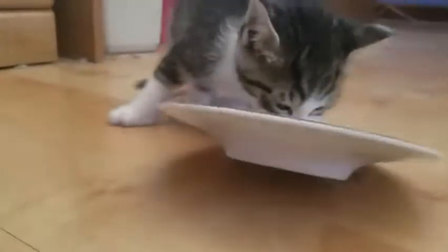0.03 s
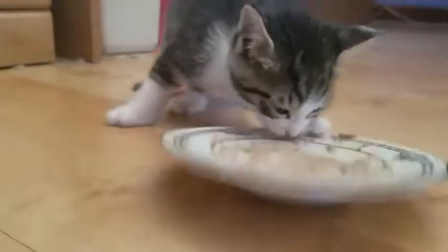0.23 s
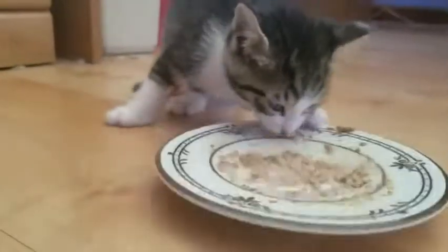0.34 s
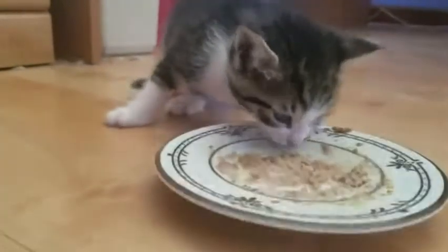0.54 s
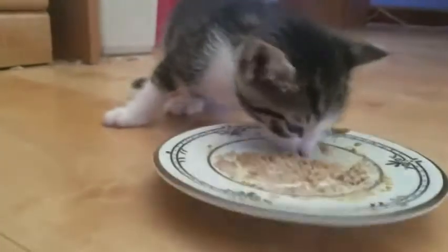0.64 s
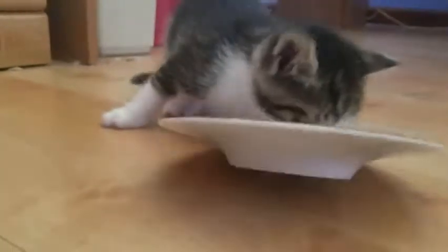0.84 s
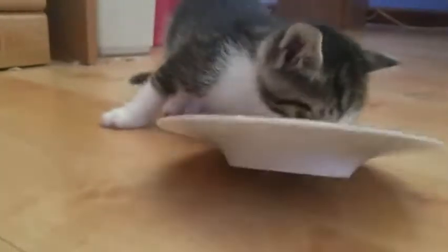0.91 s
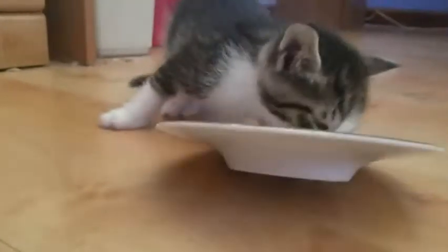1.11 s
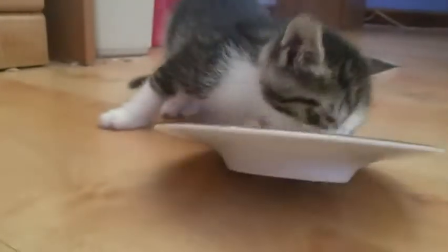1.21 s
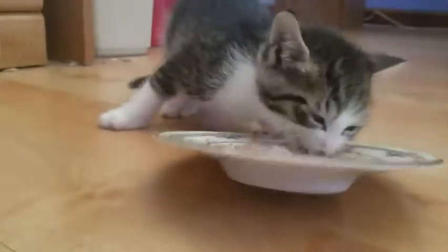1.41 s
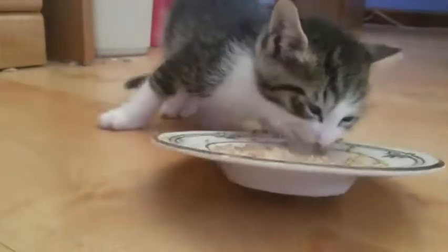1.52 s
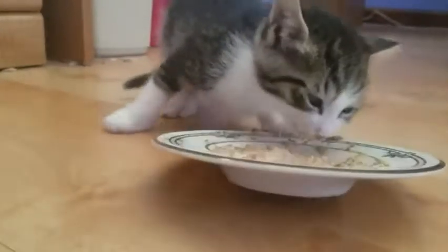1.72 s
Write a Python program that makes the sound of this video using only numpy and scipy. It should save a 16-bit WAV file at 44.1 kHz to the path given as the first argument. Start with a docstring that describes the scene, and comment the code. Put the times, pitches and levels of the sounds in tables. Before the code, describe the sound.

A ceramic plate tips and thumps on a wooden floor, drops back with a bright clink and a quick bounce, then rocks with light taps. It is heard up close in a small, quiet room.

```python
"""A ceramic plate tips on a wooden floor as a kitten feeds from it. Its rim thumps the boards, it drops
back on its foot with a clink and one bounce, and later it rocks with a few light taps. Each impact
excites damped modes of plate and boards; food and tongue add tiny gritty clicks. The small room
reverberates briefly after each blow, over a low hum and a faint hiss."""
import sys
import numpy as np
from scipy import signal
from scipy.io import wavfile

SR = 44100
rng = np.random.default_rng(int(sys.argv[2]) if len(sys.argv) > 2 else 0)


def unload_wav(signal):
    """Save mono or channel-first audio to the path in sys.argv[1] as 16-bit WAV at rate SR, clipped to [-1, 1]."""
    wavfile.write(
        sys.argv[1],
        SR,
        np.round(np.clip(np.atleast_2d(signal).T, -1, 1) * 32767).astype(np.int16),
    )


N = 77175
T = np.arange(N) / SR

# plate striking floor: start_s, thump_db, contact_cutoff_hz, clink_db, grating_db, boom_db
IMPACTS = [(.2268, -28, 2350, -25.5, -41, -54), (.2314, 3, 1310, -25, -30, -0.5),
           (.7231, -6, 2800, 0, -10.5, -9), (.7239, -24, 3186, -9.5, -32, -27.5),
           (0.7265, -7, 2620, -12, -24, -8.5), (.7501, -1.5, 1350, -25, -35.5, -6.5)]
# natural frequencies of the plate: pitch_hz
PLATE_PITCHES = [1682, 1766, 2000, 2305, 2560, 2740, 2820, 3400, 3700, 4272, 4845, 4985, 5400, 5760, 6885,
                 8290, 9165, 11780, 14815]
# the same modes, damped by floor and food: sharp_click_db, soft_push_db, t60_s, left_minus_right_db
PLATE_MODES = [(-37.5, -29.5, .22, 3), (-25, -43.5, 0.057, -9), (-22, -37, 0.0246, 0),
               (-15, -40.5, .06, 1.5), (-15, -39, 0.029, -8), (-17.5, -38, 0.021, -8.5),
               (-21.5, -37, 0.087, -1.5), (-22, -34.5, 0.054, 4), (-30, -39.5, .02, 11.5),
               (-26.5, -39.5, 0.066, -2.5), (-22, -41, 0.039, -6.5), (-17.5, -40, 0.027, -7.5),
               (-23, -34.5, 0.02423, -5.5), (-23, -29, 0.025, -2), (-26, -43, 0.027, 10),
               (-35, -41.5, 0.039, 5), (-29, -43, .05, 1), (-24, -50.5, 0.044, -4), (-31, -38.5, .05, -5.5)]
# resonances of glaze striking wood: pitch_hz, level_db, t60_s
CLACK_MODES = [(1090, -14.5, 0.0099), (2487, -9, 0.0097), (3800, -13, 0.0018), (5200, -19.5, .005),
               (10900, -24, .0012)]
# modes of the boards under the plate: pitch_hz, level_db, t60_s
BOARD_MODES = [(150, -20.5, 0.043), (313, -17, 0.026), (440, -23, 0.11), (482, -5, 0.015),
               (552, -23, 0.091), (763, -25, 0.029), (1087, -13.5, 0.0047), (1754, 1, 0.0027)]
# light contacts of the rocking plate: start_s, level_db, pitch_hz
ROCKING_TAPS = [(1.205, -45, 890), (1.218, -42, 1000), (1.224, -42, 920), (1.489, -48, 807),
                (1.5789, -28.5, 749), (1.5821, -33, 800), (1.592, -35.5, 700), (1.6105, -36, 900)]
# clicks of food and tongue, plus the high grit of the first blow's clack: start_s, level_db, t60_s, centre_hz
GRITTY_CLICKS = [(0.2348, -49, 0.022, 7700), (0.234, -39.5, 0.094, 14500), (0.468, -54.5, 0.089, 15040),
                 (.577, -60, 0.028, 7950), (0.656, -52.5, 0.017, 3950), (.672, -56.5, 0.54, 2600),
                 (1.202, -61, 0.085, 2300), (1.308, -53, 0.02, 2050), (1.5795, -54, 0.022, 5200),
                 (1.597, -55, 0.15, 13400), (1.609, -48, .08, 2500)]
# low standing waves of floor and room: pitch_hz, level_db, t60_s
STANDING_WAVES = [(122.4, -26.5, 0.36), (150.6, -12, .13), (169.7, -23.5, .36), (215.2, -27, 0.35),
                  (255.3, -32, 0.44), (291.4, -30, .32), (329, -30.5, .3), (439.6, -31.5, 0.44),
                  (549, -28.5, 0.41)]
# early wall reflections: delay_s, level_db
REFLECTIONS = [(.0059, -13.5), (.014, -15), (.0207, -18.5), (.0363, -29), (.0457, -23), (0.053, -32)]
# diffuse room tail: frequency_hz, level_re_direct_db, t60_s
REVERB_BANDS = [(70, -11.5, 0.63), (148, 1, 0.62), (280, -0.5, .4), (540, -8, 0.44), (1000, -2.5, 0.44),
                (2300, -4.5, 0.48), (5000, -1, .43), (9000, -4.5, 0.34), (15000, -6.5, 0.18)]
# left-right likeness of diffuse sound: frequency_hz, correlation
COHERENCE = [(100, .96), (300, 0.67), (600, 0.54), (1200, 0), (3000, 0.078), (15000, 0.18)]
# spectrum of the room hiss: frequency_hz, relative_density_db
HISS_SPECTRUM = [(15, -42), (25, -9.5), (43, -16.5), (64, -9.5), (111, -5.5), (326, -14.5), (503, -18),
                 (775, -22), (1160, -28), (1480, -18), (1890, -29.5), (2480, -18), (4140, -35.5),
                 (5000, -26.5), (5430, -37), (7110, -42), (16000, -32)]
# envelope of the thin hiss: time_s, level_db
THIN_HISS_LEVELS = [(0, -66), (.12, -70.5), (.25, -59.5), (.58, -77.5), (1.0, -76), (1.33, -76),
                    (1.45, -74), (1.56, -69.5), (1.68, -80)]
# envelope of the hum: time_s, level_db
HUM_LEVELS = [(0, -54.5), (.2, -56.5), (.7, -59.5), (1.0, -58.5), (1.3, -60), (1.56, -61.5), (1.74, -74)]


def plate_impacts():
    """Impact excitation: a soft push drives boards and plate, a sharp click drives plate and clack."""
    push = sharp = grating_envelope = 0
    for start_s, thump_db, contact_hz, clink_db, grating_db, _ in IMPACTS:
        push -= from_db(thump_db) * butter(impulse(start_s), contact_hz, "low")
        sharp += from_db(clink_db) * impulse(start_s)
        grating_envelope += from_db(grating_db) * decay(start_s, t60_s=0.023)
    return floorboards(push) + plate(sharp, push) + clack(sharp) + grating(grating_envelope)


def plate(sharp, soft):
    """Modal superposition: each ceramic mode rings down and radiates its own way to left and right."""
    sound = 0
    for k, (hz, (sharp_db, soft_db, t60_s, side_db)) in enumerate(zip(PLATE_PITCHES, PLATE_MODES)):
        force = from_db(sharp_db) * sharp + from_db(soft_db) * soft
        sound += (-1) ** k * pan(resonator(force, hz, t60_s), side_db)   # alternating polarity
    return sound


def clack(force):
    """Heavy damping: the broad resonances of glaze on wood die within milliseconds."""
    return sum((-1) ** k * from_db(db) * resonator(force, hz, t60_s)
               for k, (hz, db, t60_s) in enumerate(CLACK_MODES))


def grating(envelope):
    """Friction noise: the glaze grates on the boards at each contact."""
    noise = butter(envelope * rng.standard_normal((2, N)), 1900, "high")
    return butter(noise, 4460, "low", order=1)


def floorboards(force):
    """Damped wooden modes give a short thud; radiation efficiency falls in the deep bass."""
    thud = sum(from_db(db) * resonator(force, hz, t60_s) for hz, db, t60_s in BOARD_MODES)
    return butter(thud, 130, "high", order=1)


def rocking_taps():
    """Light knocks wake boards, plate and the cavity resonance of the air pocket under the plate."""
    force = knocks = 0
    for start_s, db, hz in ROCKING_TAPS:
        push = -from_db(db) * butter(impulse(start_s), 1170, "low")   # soft contact has little treble
        force += push
        knocks += resonator(push, hz, t60_s=0.011)
    cavity = from_db(-30) * resonator(force, hz=666, t60_s=0.18)
    return knocks + cavity + from_db(-6) * floorboards(force) + from_db(2.5) * plate(force, soft=0)


def gritty_clicks():
    """Noise transients: food and tongue, and the clack of the first blow, make decaying bursts half an octave
    wide."""
    white = rng.standard_normal(N)
    grit = 0
    for start_s, db, t60_s, hz in GRITTY_CLICKS:
        band = butter(white, [hz / 2 ** .25, hz * 2 ** .25], "band")
        grit += from_db(db) * decay(start_s, t60_s) * band / band.std()
    return grit


def boom(delay_s=0.007456):
    """Standing waves: the blows set the low modes of floor and room ringing a moment later."""
    force = sum(from_db(boom_db) * impulse(start_s + delay_s) for start_s, *_, boom_db in IMPACTS)
    force = butter(force, 510, "low")
    force = butter(force, 85.25, "high")
    return sum(from_db(db) * resonator(force, hz, t60_s) for hz, db, t60_s in STANDING_WAVES)


def reverberation(sound, onset_s=0.0012, build_s=0.0084):
    """Convolution with the room's impulse response: early reflections, then a tail dying band by band."""
    reflections = sum(from_db(db) * impulse(delay_s) for delay_s, db in REFLECTIONS)
    response = butter(reflections, 2300, "low", order=1)
    build_up = np.clip((T - onset_s) / build_s, 0, 1)
    for hz, band in diffuse_bands():
        tail = band * build_up * decay(0, t60_s=at_hz(REVERB_BANDS, hz, column=2))
        tail *= band.std() / np.sqrt(np.sum(tail ** 2) / 2)   # energy independent of decay time
        response = response + from_db(at_hz(REVERB_BANDS, hz)) * tail
    return signal.fftconvolve(sound, response, axes=1)[:, :N]


def room_hiss():
    """Spectral shaping: weighted bands of diffuse noise sum to a steady hiss."""
    hiss = sum(from_db(at_hz(HISS_SPECTRUM, hz)) * band for hz, band in diffuse_bands())
    return from_db(-59.5) * hiss / hiss.std()


def thin_hiss(centre_hz=5100, width_hz=440):
    """Narrow-band noise under a slow envelope: a high hiss comes and goes."""
    edges_hz = [centre_hz - width_hz / 2, centre_hz + width_hz / 2]
    hiss = butter(rng.standard_normal((2, N)), edges_hz, "band", order=1)
    level_db = np.interp(T, *np.transpose(THIN_HISS_LEVELS))
    return from_db(level_db) * hiss / hiss.std()


def hum(pitch_hz=95.6, waver_db=1.5):
    """Amplitude modulation: a low sine tone wavers at random as it fades."""
    waver = butter(rng.standard_normal(2 * N), 6, "low")[N:]
    level_db = np.interp(T, *np.transpose(HUM_LEVELS)) - waver_db * waver / waver.std()
    return from_db(level_db) * np.sqrt(2) * np.sin(2 * np.pi * pitch_hz * T)


def diffuse_bands():
    """A diffuse field is coherent mainly in the bass: yields centre_hz and third-octave stereo noise."""
    white = rng.standard_normal((2, 2, N))
    edges_hz = 20 * 2 ** (np.arange(31) / 3)
    for k, (low, high) in enumerate(zip(edges_hz, edges_hz[1:])):
        mid, side = butter(white[k % 2], [low, high], "band")
        hz = np.sqrt(low * high)
        alike = at_hz(COHERENCE, hz)
        yield hz, np.sqrt((1 + alike) / 2) * mid + np.sqrt((1 - alike) / 2) * side * [[1], [-1]]


def resonator(force, hz, t60_s):
    """Damped harmonic oscillator: a unit impulse sets it ringing at amplitude 1."""
    radius = np.exp(-np.log(1000) / (t60_s * SR))
    angle = 2 * np.pi * hz / SR
    return signal.lfilter([.5, 0, -.5], [1, -2 * radius * np.cos(angle), radius ** 2], force + 1e-18)


def impulse(start_s):
    """A unit impulse, which excites all frequencies equally."""
    return 1. * (np.arange(N) == int(start_s * SR))


def decay(start_s, t60_s):
    """Exponential decay from start_s, falling 60 dB in t60_s."""
    return (T >= start_s) * np.exp(-np.log(1000) * np.maximum(T - start_s, 0) / t60_s)


def butter(sound, hz, kind, order=2):
    """Butterworth filter, maximally flat in its passband."""
    sections = signal.butter(order, np.clip(hz, 10, .49 * SR), kind, fs=SR, output="sos")
    return signal.sosfilt(sections, sound + 1e-18)


def pan(sound, left_minus_right_db):
    """A level difference between the ears gives direction."""
    return sound * from_db([[left_minus_right_db / 2], [-left_minus_right_db / 2]])


def at_hz(table, hz, column=1):
    """Interpolation of a table column on a log-frequency axis."""
    table = np.array(table)
    return np.interp(np.log(hz), np.log(table[:, 0]), table[:, column])


def from_db(db):
    """Decibels to amplitude ratio."""
    return 10 ** (np.asarray(db) / 20)


def scene(right_lag_s=0.00012):
    """Superposition of the nearby plate's direct sound, the room's response and the background."""
    loud = plate_impacts()
    light = rocking_taps() + gritty_clicks()
    left, right = loud + light
    direct = np.array([left, np.interp(T - right_lag_s, T, right)])
    in_room = direct + boom() + reverberation(loud + from_db(-4.5) * light)
    in_room = butter(in_room, 80, "high", order=1)
    background = room_hiss() + thin_hiss() + hum()
    return pan(in_room + background, left_minus_right_db=-2.47)


def record(dry, ceiling=0.99, cutoff_hz=16000):
    """Soft saturation rounds the loudest peaks; a steep low-pass removes the highest treble."""
    rounded = ceiling * np.tanh(dry / ceiling)
    return signal.sosfilt(signal.ellip(10, .1, 90, cutoff_hz, fs=SR, output="sos"), rounded)


dry = scene()
out = record(dry)
unload_wav(out)
```